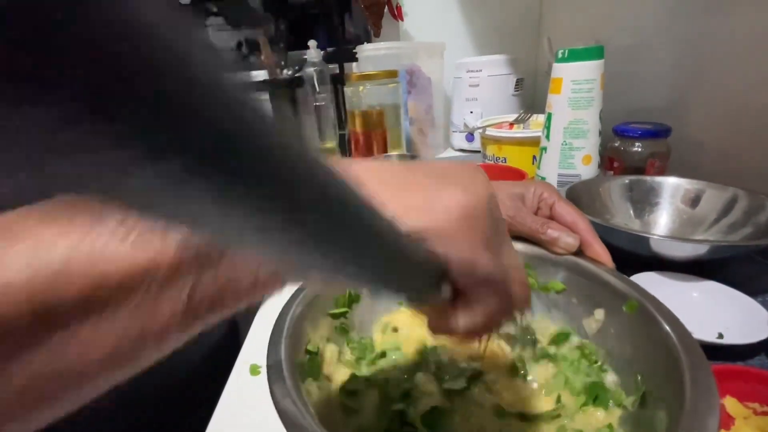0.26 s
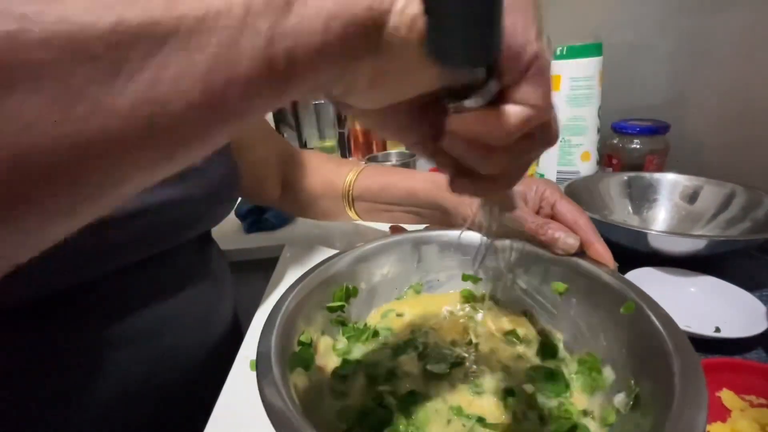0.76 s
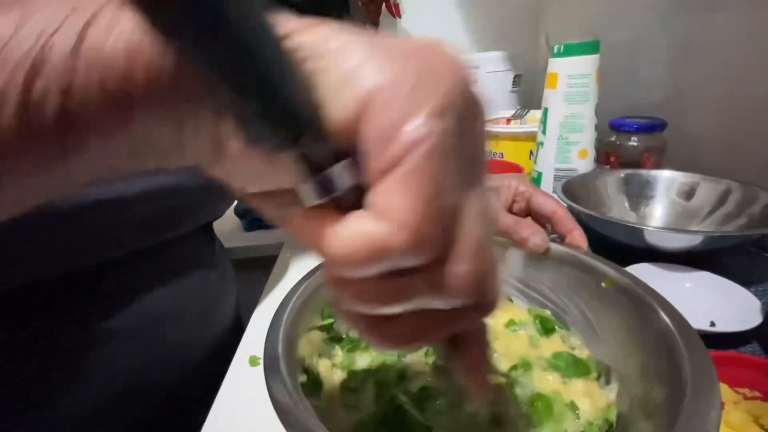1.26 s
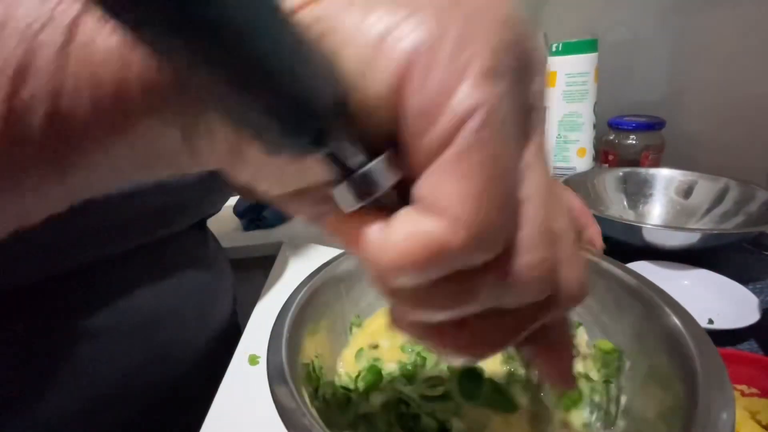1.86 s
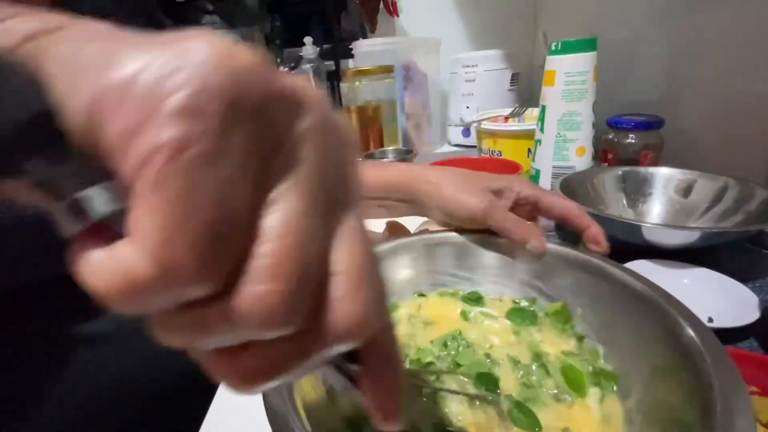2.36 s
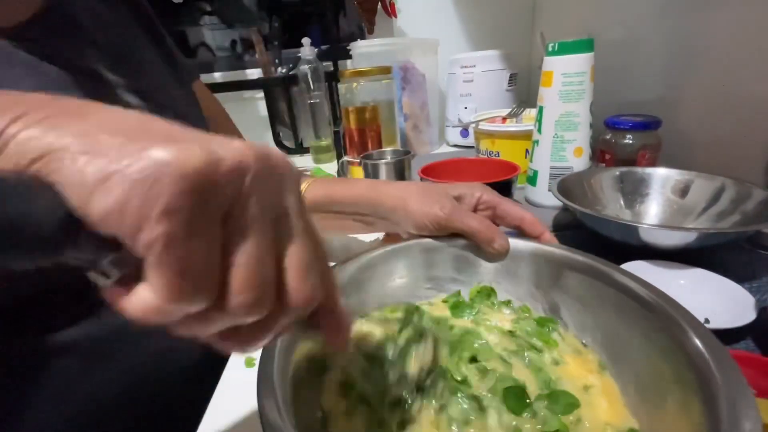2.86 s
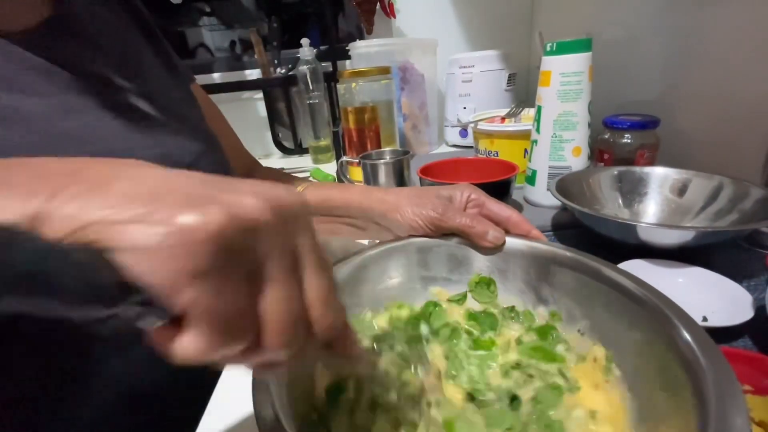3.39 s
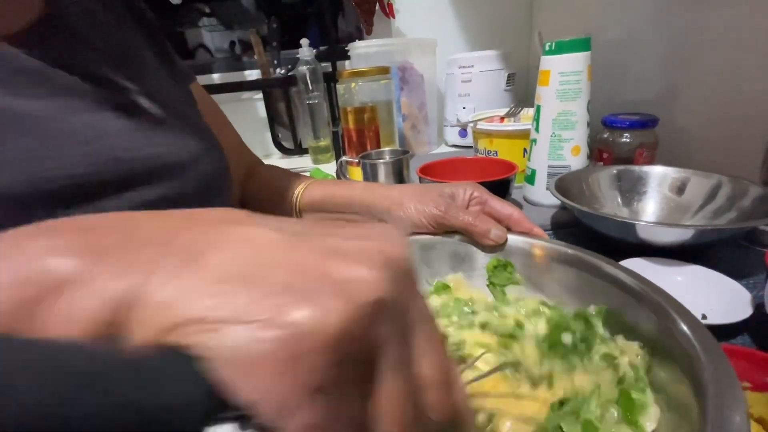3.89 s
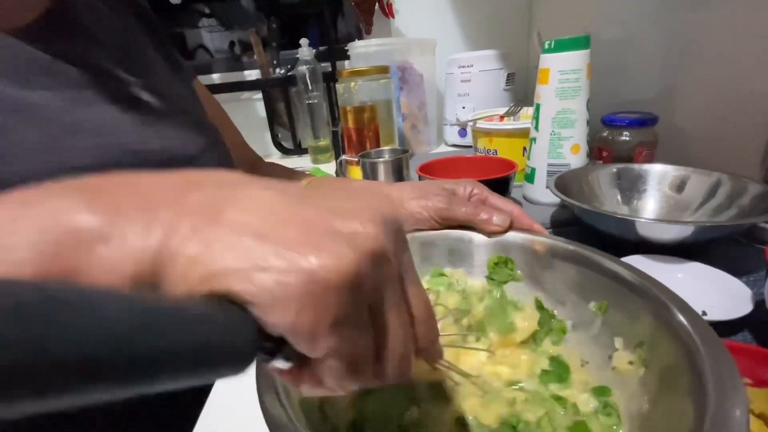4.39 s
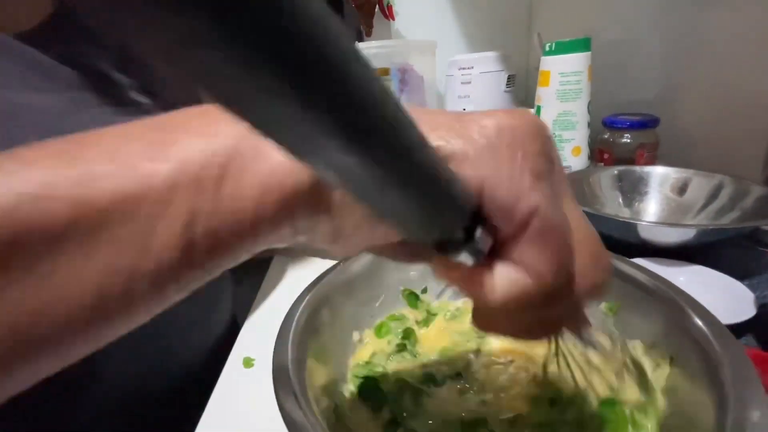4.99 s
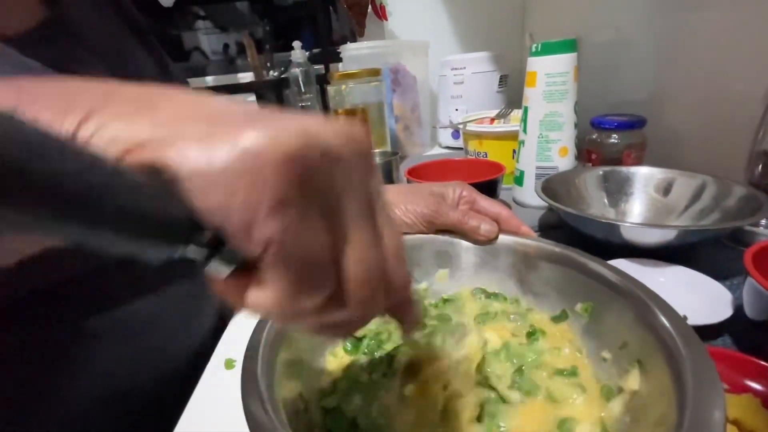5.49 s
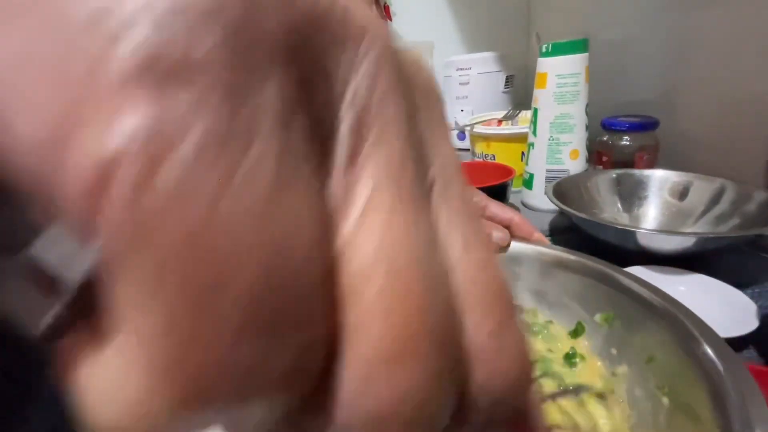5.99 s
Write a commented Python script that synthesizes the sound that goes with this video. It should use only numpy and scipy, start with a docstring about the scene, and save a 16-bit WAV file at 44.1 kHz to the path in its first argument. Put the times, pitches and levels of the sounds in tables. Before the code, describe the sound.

Close to the microphone in a small tiled kitchen, a wire whisk beats egg and leaves in a steel bowl. Bright clacks and gritty scrapes come irregularly, the bowl ringing most freely around two seconds. After three seconds it softens to little ticks, faint squeaks and wet swishes, then hard strikes return with dull thumps from the counter.

```python
"""Whisking eggs in a steel bowl

A wire whisk beats eggs and leaves in a steel bowl on a kitchen counter, close to two microphone ports.
Strokes slap wires on the wall (noise bursts through bowl modes), then drag them round it (gritty noise);
single wires and wet leaves tick and squeak. The rocking bowl thumps the counter (two decaying sines, rumble).
A small tiled kitchen answers (decaying-noise echoes) over a faint room hiss (shaped noise)."""
import sys
import numpy as np
from scipy import signal
from scipy.fft import rfft, irfft, next_fast_len
from scipy.io import wavfile
from scipy.ndimage import uniform_filter1d, map_coordinates

SR = 44100
rng = np.random.default_rng(int(sys.argv[2]) if len(sys.argv) > 2 else 0)


def store_wav(level_fs):
    """Save 16-bit WAV to argv[1]."""
    pcm = np.round(np.clip(np.atleast_2d(level_fs), -1, 1) * 32767)
    wavfile.write(sys.argv[1], SR, pcm.T.astype(np.int16))


N = 275625
HALF = np.array([[.5], [-.5]])  # splits a left-right difference over the two ports


def amp(db):
    """Amplitude of a level in dB."""
    return 10 ** (np.asarray(db) / 20)


def unit(x):
    """x at RMS 1."""
    return x / np.sqrt(np.mean(x ** 2) + 1e-20)


def along(points, hz):
    """(Hz, value) points interpolated on a log frequency axis."""
    f, v = np.transpose(points)
    return np.interp(np.log(hz + 1), np.log(f + 1), v)


def wobble(rate_hz):
    """Smooth random curve with rate_hz knots a second."""
    knots = rng.standard_normal(int(N * rate_hz / SR) + 4)
    return map_coordinates(knots, [np.arange(N) * rate_hz / SR])


def filtered(x, response):
    """x through a complex response of frequency, zero-padded."""
    n = x.shape[-1]
    m = next_fast_len(n + 8192)
    return irfft(rfft(x, m) * response(np.fft.rfftfreq(m, 1 / SR)), m)[..., :n]


def peak(hz, centre_hz, width_hz):
    """Response of one causal resonance, 1 at its centre."""
    return 1j * hz * width_hz / (centre_hz ** 2 - hz ** 2 + 1j * hz * width_hz)


# bowl modes: (frequency [Hz], level over the broad sound at ring_db 0 [dB], t60 at damping 1 [s])
BOWL_MODES = [(322, 14.5, 0.56), (464.6, 15.5, 0.061), (620, -9, 0.81), (912.7, 11, 0.25),
              (1155, 7.5, 0.57), (1270, 10.5, 0.33), (1388, 9.5, 0.22), (1778, 6.5, .2), (2032, 6.5, 0.031),
              (2245, 18, 0.1), (2560, 10, 0.54), (3163, 7.5, 0.12), (4040, 7.5, .15), (4260, 12.5, 0.13),
              (4780, 3, 0.34), (6780, 6, 0.18), (7330, 10.5, 0.034), (6970, 8.5, 0.33), (8030, 8.5, 0.057),
              (7640, 10, 0.078), (7940, 12.5, 0.0032)]
# broad sound of the steel wall: (frequency [Hz], level [dB])
WALL_SPECTRUM = [(120, -51.5), (200, -12.5), (323, -12), (615, -8.5), (663, -8), (940, -2), (1520, -4),
                 (4030, -14), (7970, -16), (12400, -18.5), (16400, -45)]


def wall(hz, ring_db, scatter_db, damping):
    """The bowl's answer to a force: a broad sound plus its modes, each at a new random strength."""
    total = np.ones(len(hz), complex)
    for k, (centre_hz, db, t60_s) in enumerate(BOWL_MODES):
        gain = amp(db + ring_db + rng.normal(0, scatter_db))
        width_hz = damping * np.log(1000) / (np.pi * t60_s)
        total += (-1) ** k * gain * peak(hz, centre_hz, width_hz)
    return total * amp(along(WALL_SPECTRUM, hz))


# how freely the bowl rings as the steadying hand's grip varies: (time [s], ring level [dB])
RING_FREEDOM = [(0, -6), (1.0, -11), (1.5, -5), (1.85, 1.5), (2.3, 4), (2.7, -4), (3.5, -11.5),
                (6.25, -3.5)]
# zones levelled separately in a strike: (low edge [Hz], high edge [Hz])
STRIKE_ZONES = [(200, 700), (700, 2500), (2500, 6000), (6000, 9500), (9500, 13000)]
# wires slapping the steel: (time [s], middle-zone level [dB], second zone over it [dB],
# fourth zone (shimmer) over it [dB], body pitch [Hz], clatter t60 [s], left-right [dB])
STRIKES = [(0.2069, -30, 8.5, 4.5, 1236, 0.059, -2), (0.4991, -31, 3, -0.5, 1230, 0.041, -2.5),
           (0.5638, -29, -2.5, -3, 1270, 0.022, -4), (0.815, -24, -4, -4.5, 1240, 0.058, -2),
           (0.8771, -34.5, 6, -1, 720, 0.047, -4.5), (1.1735, -29.5, 0.5, 4, 1305, 0.077, -1),
           (1.496, -24, -1, 2.5, 874, 0.034, -3.5), (1.8554, -28.5, 7, 10.5, 2390, 0.038, 2.5),
           (2.2443, -34.5, 5.5, 2, 836, 0.067, 1.5), (2.383, -48, 17, 12.5, 1150, 0.01, 6.5),
           (2.6639, -26, -1, 4, 1365, 0.037, -2.5), (2.6791, -27.5, 3.5, 3.5, 1290, 0.02, -5.5),
           (2.7602, -39.5, 0, 5, 1440, 0.03, 0.5), (3.7374, -57, 4, -7, 1180, 0.099, -1),
           (3.9932, -45.5, 1, -3, 882, 0.063, -2), (4.5922, -22.5, -1.5, -7.5, 1190, 0.047, -0.5),
           (4.9339, -30.5, 8, 4, 1490, 0.025, -1), (5.665, -34, 8, 0, 2040, 0.052, -5.5),
           (5.9999, -28.5, -3, 1.5, 1300, 0.061, 2), (6.0164, -35, 2.5, -5, 980, 0.11, -3),
           (6.0448, -35, -1, -1.5, 1390, 0.055, 2)]
KNOCK_DB, KNOCK_DB_PER_DB = -7, 0.52  # lowest zone over the middle; gain per dB of ring freedom
TOP_DB = -6.5  # highest zone over the shimmer
CRACK_T60_S = 0.004  # also the shortest clatter


def strikes():
    """Wires crack, then land in a dying clatter that rings the bowl; where they land sets the zone levels."""
    out, t = np.zeros((2, N + SR)), np.arange(SR // 2) / SR
    grid_hz = np.fft.rfftfreq(len(t), 1 / SR)
    for s, db, body_db, shimmer_db, body_hz, t60_s, pan_db in STRIKES:
        clatter_s = max(t60_s, CRACK_T60_S)
        landings = amp(4.46 * np.repeat(rng.standard_normal(len(t) // 50), 50))  # uneven
        fade = amp(-60 * t / clatter_s) + 0.79 * amp(-60 * t / CRACK_T60_S)
        attack = 1 - np.exp(-t / 0.000067)
        force = rng.standard_normal(len(t)) * landings * fade * attack
        force = np.pad(force, (40, 0))[:len(t)]  # room for filter pre-response

        ring_db = np.interp(s, *np.transpose(RING_FREEDOM))
        grip = 1.3 * amp(-.45 * ring_db)  # firmer grip also shortens the ring

        def struck_patch(hz):
            clank = 1 + 2.0 * peak(hz, body_hz, 150)
            return wall(hz, ring_db, scatter_db=3.5, damping=grip) * clank

        sound = filtered(force, struck_patch)

        power = np.abs(rfft(sound)) ** 2 / (len(t) * SR * clatter_s)
        knock_db = KNOCK_DB + KNOCK_DB_PER_DB * ring_db
        levels_db = db + np.array([knock_db, body_db, 0, shimmer_db, shimmer_db + TOP_DB])
        zone_gains = []
        for (lo, hi), level_db in zip(STRIKE_ZONES, levels_db):
            zone_db = 10 * np.log10(power[(grid_hz > lo) & (grid_hz < hi)].sum())
            zone_gains.append((np.sqrt(lo * hi), level_db - zone_db))

        lag_s = rng.normal(0, .00004)  # path difference to the two ports

        def place(hz):
            return amp(along(zone_gains, hz) + HALF * pan_db) * np.exp(2j * np.pi * hz * HALF * lag_s)

        out[:, round(s * SR) - 15:][:, :len(t)] += filtered(sound, place)
    return out[:, :N]


# wires dragging through the egg along the steel: (start [s], contact [s], middle-zone level [dB],
# low zone over it [dB], high zone (shimmer) over it [dB])
DRAGS = [(0.0, 0.0046, -38.5, 2.5, 0.5), (.21, 0.036, -33, 2.5, 5.5), (.505, 0.055, -49, 8, 9),
         (.57, 0.071, -47.5, 5.5, 9), (.7, 0.05, -54.5, 9, -5.5), (.82, 0.044, -36.5, 3.5, 4),
         (.885, 0.089, -39.5, 2, 8.5), (1.18, 0.056, -28, 0, 5.5), (1.5, 0.08, -34, 0.5, 7),
         (1.865, 0.12, -39.5, 4.5, 6), (2.25, 0.12, -42, 4.5, 4.5), (2.385, 0.056, -43, 3.5, 5),
         (2.67, 0.11, -33, -2.5, 4.5), (3.11, 0.15, -54, 1, -2), (3.36, 0.53, -60, -7, -4),
         (3.755, 0.047, -45, -2.5, -5.5), (3.83, 0.063, -47.5, 0, -4.5), (4.019, 0.034, -45.5, 0, -5),
         (4.12, 0.017, -70, -2, -17), (4.28, 0.13, -63.5, 11, 2), (4.6, 0.071, -32.5, -3, 1.5),
         (4.94, 0.059, -44.5, 1, 8), (5.1, 0.29, -58.5, -2, -2.5), (5.3, 0.17, -49.5, -0.5, -4.5),
         (5.67, 0.067, -39.5, 1.5, 6), (6.01, 0.084, -32, -4, 6)]
# fade after lift-off: (low zone [dB/s], middle zone [dB/s], high zone [dB/s])
LIFT_FADE_DB_PER_S = [171, 219.5, 269.5]
# egg sloshing on, low/middle/high zone: level under the drag, fade
SLOSH_DB, SLOSH_DB_PER_S = [-14.5, -18, -22], [42, 57.5, 72.5]
LAND_S, SAG_DB = .005, 7  # wires settle, then slow down while they touch


def drags():
    """Stick-slip friction through the bowl in three zones: lands, sags, fades once the wires lift."""
    power, t = np.zeros((3, N + SR)), np.arange(SR) / SR
    fade, slosh_db, slosh_fade = np.array([LIFT_FADE_DB_PER_S, SLOSH_DB, SLOSH_DB_PER_S])[:, :, None]
    for s, contact_s, db, body_db, shimmer_db in DRAGS:
        after_s = np.maximum(t - contact_s, 0)
        sag = amp(-SAG_DB * np.minimum(t / contact_s, 1))
        lifted = amp(-fade * after_s) + amp(slosh_db - slosh_fade * after_s)
        landing = np.minimum(t / LAND_S, 1)
        zones = amp(db + np.array([[body_db], [0], [shimmer_db]]))
        power[:, round(s * SR):][:, :SR] += (zones * sag * lifted * landing) ** 2

    grit = rng.standard_normal(N) * amp(0.89 * wobble(400) + 1.5 * wobble(45))
    # patchy over time and frequency
    z = signal.stft(grit, nperseg=512)[2]
    patches = uniform_filter1d(rng.standard_normal(z.shape), 5, 0)
    patches = uniform_filter1d(patches, 8, 1)
    grit = signal.istft(z * amp(2.8 * unit(patches)), nperseg=512)[1][:N]
    rub = filtered(grit, lambda hz: wall(hz, ring_db=-8.5, scatter_db=1.5, damping=3.0))

    out = np.zeros(N)
    edges_hz = [(0, 2500), (2500, 6000), (6000, 13500)]
    for zone_power, (lo, hi) in zip(power, edges_hz):
        zone = filtered(rub, lambda hz: (hz >= lo) & (hz < hi))
        out += np.sqrt(zone_power[:N]) * unit(zone)
    return out


# single wires ticking and wet leaves snapping: (time [s], peak level [dB], pitch [Hz])
TICKS = [(0.2394, -12.5, 6920), (0.6424, -22.5, 7400), (0.6924, -36.5, 6900), (0.7168, -33.5, 1620),
         (1.0236, -29.5, 10000), (1.386, -32.5, 8870), (2.7284, -23.5, 2410), (2.7896, -27.5, 7160),
         (3.0995, -34.5, 3430), (3.1308, -28, 3570), (3.1777, -33, 6880), (3.291, -35, 1380),
         (3.461, -36, 1670), (3.6242, -38.5, 2370), (3.825, -23.5, 2020), (3.853, -26, 4150),
         (3.9437, -30.5, 2390), (3.9997, -30, 3720), (4.2805, -34, 2020), (4.339, -24, 2040),
         (4.35, -18, 1976), (5.119, -40, 3500), (5.2586, -31, 2110), (5.2674, -31, 2030),
         (5.3026, -23, 2080), (5.4171, -16.5, 2540), (5.4852, -41, 1530)]
EDGE_DB = -24.5  # resonance gain of the bright edge against the ring


def ticks():
    """Snaps of a few milliseconds: a short ring and a bright edge; faint chance ones fill the stirring."""
    out, t = np.zeros(N + SR), np.arange(SR // 20) / SR
    chance = rng.uniform(size=(70, 3))
    faint = [(a * N / SR, -52 + 9 * b, 1500 * 5 ** c) for a, b, c in chance]
    for s, db, pitch_hz in [*TICKS, *faint]:
        snap = rng.standard_normal(len(t)) * amp(-60 * t / .011)

        def ring_and_edge(hz):
            return 0.1 + peak(hz, pitch_hz, .4 * pitch_hz) + amp(EDGE_DB) * peak(hz, 10000, 5000)

        tick = filtered(snap, ring_and_edge)
        out[round(s * SR):][:len(t)] += amp(db) * tick / np.abs(tick).max()
    return out[:N]


# wet wire squeaking briefly on the steel: (time [s], peak level [dB], pitch [Hz])
SQUEAKS = [(3.3674, -41.5, 2440), (3.3883, -42, 2430), (5.921, -45, 4360), (5.929, -51, 4420)]


def squeaks():
    """Soft blips of a few milliseconds: swelling, dying noise through a narrow resonance at the pitch."""
    out, t = np.zeros(N + SR), np.arange(SR // 20) / SR
    for s, db, pitch_hz in SQUEAKS:
        noise = rng.standard_normal(len(t)) * t * amp(-60 * t / 0.013)
        blip = filtered(noise, lambda hz: peak(hz, pitch_hz, .1 * pitch_hz) ** 2)
        out[round(s * SR):][:len(t)] += amp(db) * blip / np.abs(blip).max()
    return out[:N]


# bowl rocking on the counter: (time near the swell's peak [s], low-mode level [dB])
THUMPS = [(0.009, -41.5), (0.233, -19), (0.511, -32.5), (0.345, -39.5), (0.41, -51), (0.708, -58),
          (0.828, -33.5), (1.208, -47.5), (1.519, -40), (1.732, -50.5), (1.879, -36), (1.987, -34.5),
          (2.322, -33.5), (2.701, -37.5), (3.16, -56), (3.226, -50.5), (3.491, -57.5), (3.552, -52),
          (3.751, -54), (3.849, -33.5), (4.014, -46.5), (4.37, -40), (4.622, -17), (4.72, -34), (4.96, -22),
          (5.03, -42), (5.243, -46), (5.695, -36.5), (6.035, -37.5)]
BOOM_HZ, BOOM_SPREAD, UPPER_HZ = 92.8, 0.045, 144  # low mode, its relative scatter, second mode
UPPER_DB, UPPER_DB_PER_DB = -4, .35  # second over low mode at a -22.5 dB thump; gain per dB of strength


def thumps():
    """The counter swells, booms on two low modes with a loose rumble, and is soon damped."""
    out, t = np.zeros(N + SR), np.arange(SR // 2) / SR
    for s, db in THUMPS:
        pitch_hz = BOOM_HZ * (1 + BOOM_SPREAD * rng.normal())
        upper_db = UPPER_DB + UPPER_DB_PER_DB * (db + 22.5)
        u = t / 0.02
        swell = u ** 2 * np.exp(2 - 2 * u)
        swell += 0.08 * (1 - np.exp(-u)) * amp(-60 * t / 0.7)  # weak slower tail
        boom = np.sin(2 * np.pi * pitch_hz * t)
        boom += amp(upper_db) * np.sin(2 * np.pi * UPPER_HZ * t + rng.uniform(0, 2 * np.pi))
        rumble = unit(filtered(rng.standard_normal(len(t)), lambda hz: peak(hz, 110, 110) ** 2))
        start = max(round((s - .018) * SR), 0)
        out[start:][:len(t)] += amp(db) * (boom + 0.31 * rumble) * swell
    return out[:N]


# decay of the tiled room: (frequency [Hz], t60 [s])
KITCHEN_DECAY = [(200, 0.28), (2000, .25), (10000, 0.17)]


def kitchen(x):
    """Noise dying at its own speed per frequency, drawn separately for each port and each third of a second."""
    out, step = np.zeros((2, N + 2 * SR)), SR // 3
    for start in range(0, N, step):
        hz, t, z = signal.stft(rng.standard_normal((2, SR // 2)), SR, nperseg=256)
        decay = amp(-60 * t / along(KITCHEN_DECAY, hz)[:, None])
        tail = signal.istft(z * decay, SR, nperseg=256)[1]
        tail = tail / np.linalg.norm(tail[0])
        echo = signal.fftconvolve(x[None, start:start + step], tail, axes=1)
        out[:, start + 130:][:, :echo.shape[1]] += echo  # about 3 ms pre-delay
    return out[:, :N]


# relative hiss spectrum: (frequency [Hz], density [dB per Hz])
HISS_SPECTRUM = [(18, -24), (30, 2), (86, 7), (261, -6.5), (639, -5.5), (1110, -1.5), (2210, -5.5),
                 (11600, -26), (12900, -24), (14300, -66.5), (16400, -64)]
HISS_DB = -57.5


def hiss():
    """Room air and microphone noise of wavering level; the ports share the bass and differ higher up."""
    a, b = rng.standard_normal((2, N))

    def turn(hz):
        return np.clip(along([(100, 0.17), (400, 1.0)], hz), 0, np.pi / 4)

    mid = filtered(a, lambda hz: amp(along(HISS_SPECTRUM, hz)) * np.cos(turn(hz)))
    side = filtered(b, lambda hz: amp(along(HISS_SPECTRUM, hz)) * np.sin(turn(hz)))
    return amp(HISS_DB + 1.3 * wobble(2.81)) * unit(np.array([mid + side, mid - side]))


# phase between the two microphone ports: (frequency [Hz], left lead [rad])
PORT_PHASE = [(0, 0.5), (690, -1.73), (5000, -2), (7240, -1.57), (10400, -1.5), (13000, -24),
              (13900, -36.5), (16100, -22)]
# level between the two ports: (frequency [Hz], left-right [dB])
PORT_LEAN = [(60, -3.5), (150, 7.5), (380, 5.5), (950, 5.5), (2380, 1.5), (5980, 7), (15000, -5.5)]


def scene():
    """The bowl near the two ports, the counter below, the kitchen around."""
    bowl = strikes() + drags() + ticks() + squeaks()

    def ports(hz):
        return amp(HALF * along(PORT_LEAN, hz)) * np.exp(1j * HALF * along(PORT_PHASE, hz))

    near = filtered(bowl, ports)
    counter = thumps()
    room = amp(-9) * kitchen(bowl.mean(0)) + amp(-6) * kitchen(counter)
    return near + counter * amp([[-.3], [.3]]) + room + hiss()


TOP_HZ = 16500


def record(dry):
    """Soft saturation towards full scale, then a band limit sloping to nothing at TOP_HZ."""
    soft = dry / (1 + np.abs(dry) ** 8) ** (1 / 8)
    return filtered(soft, lambda hz: np.clip((TOP_HZ - hz) / 300, 0, 1))


dry = scene()
out = record(dry)
store_wav(out)
```